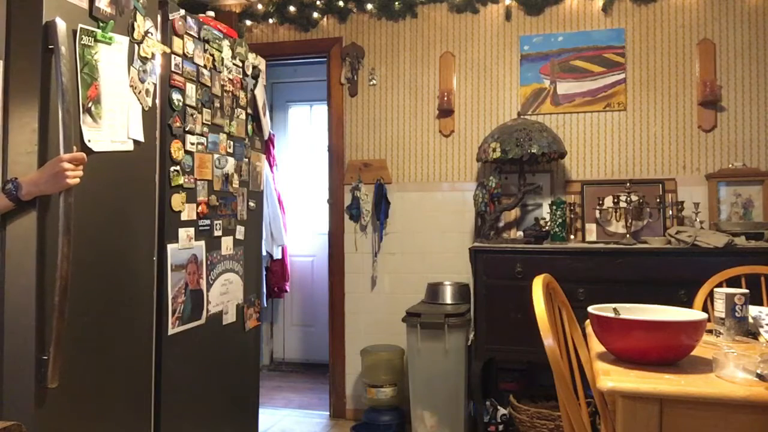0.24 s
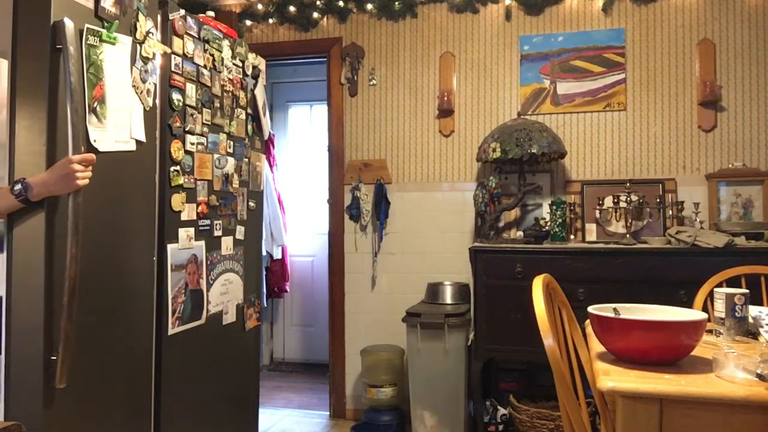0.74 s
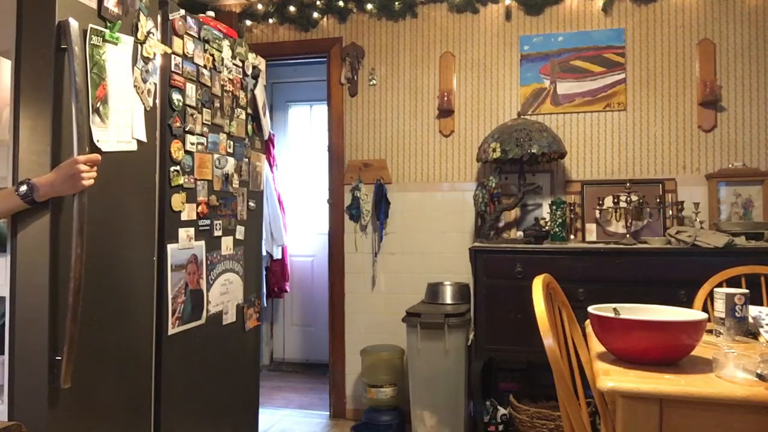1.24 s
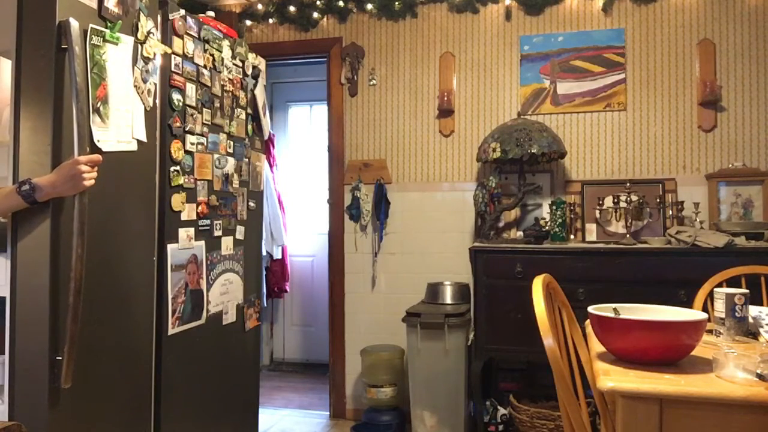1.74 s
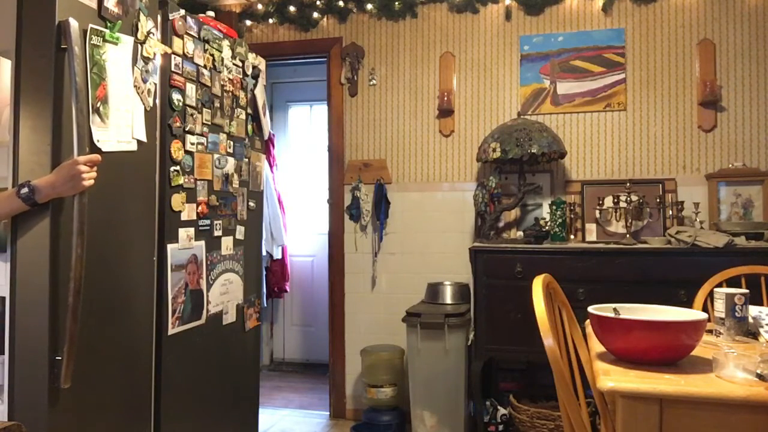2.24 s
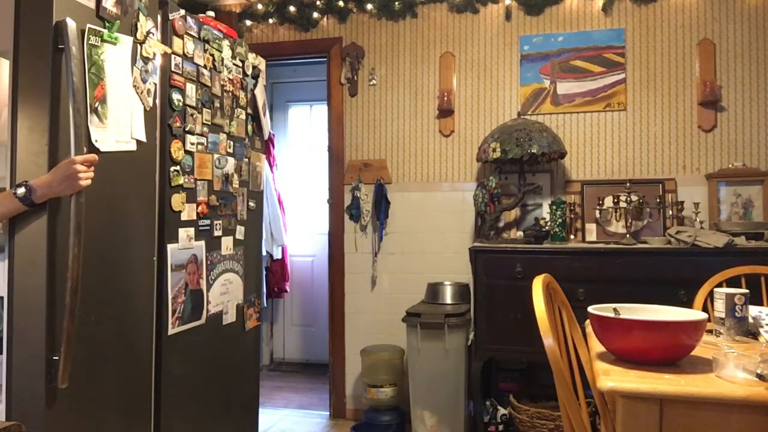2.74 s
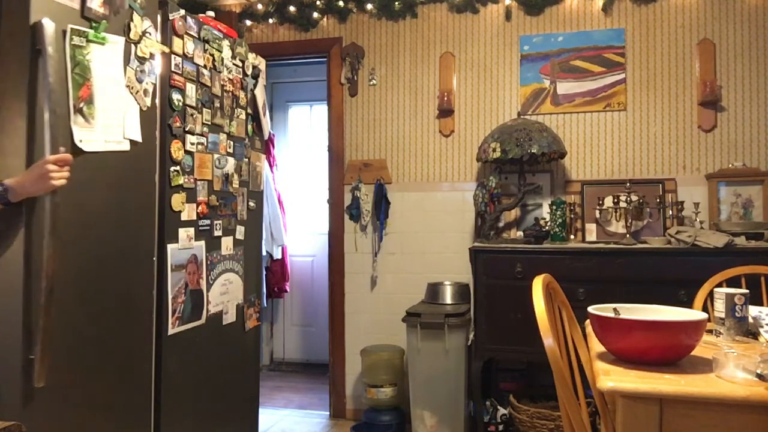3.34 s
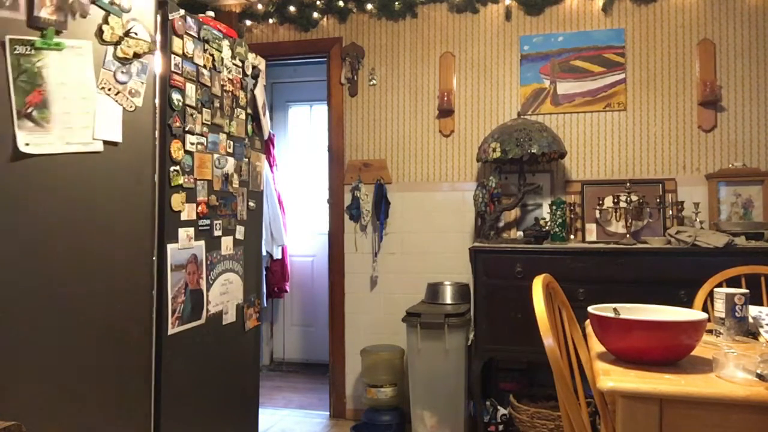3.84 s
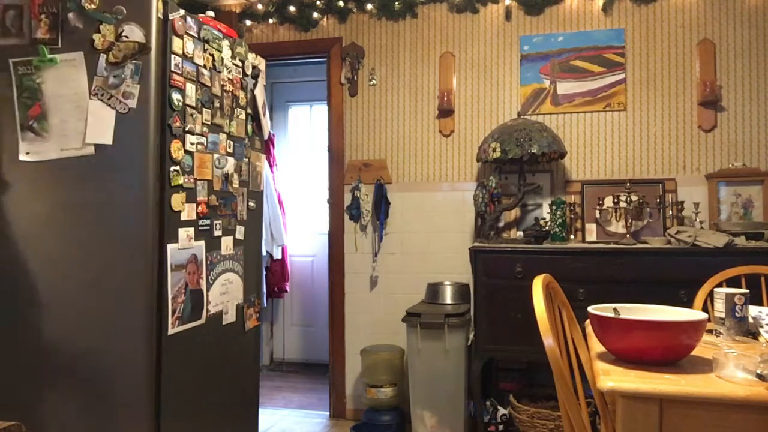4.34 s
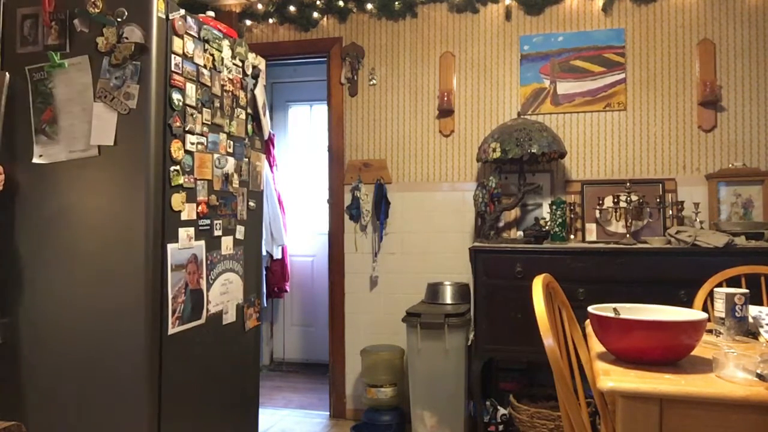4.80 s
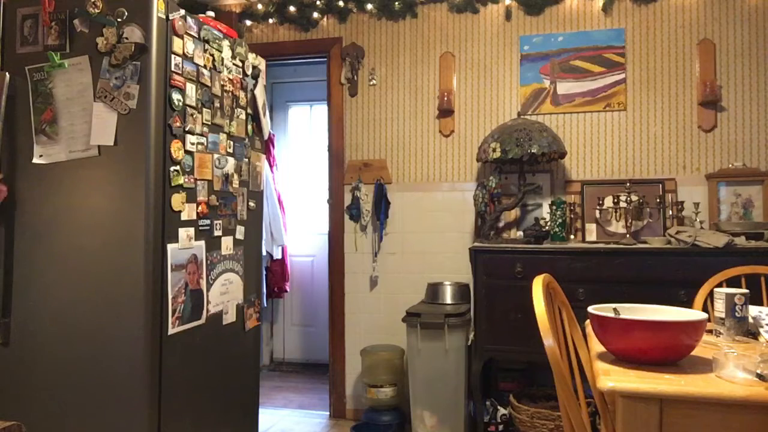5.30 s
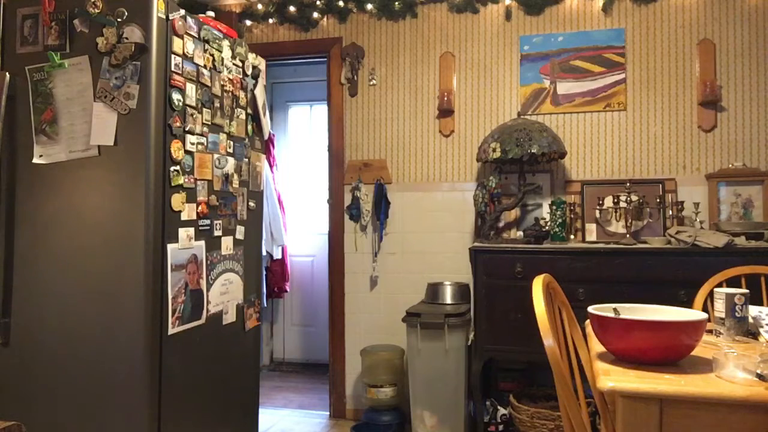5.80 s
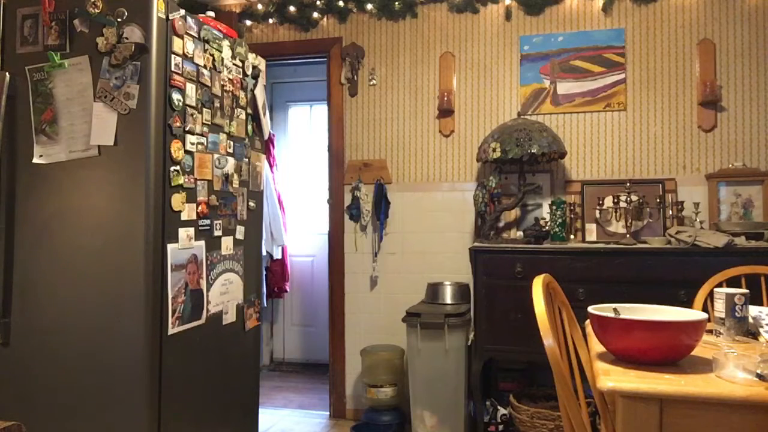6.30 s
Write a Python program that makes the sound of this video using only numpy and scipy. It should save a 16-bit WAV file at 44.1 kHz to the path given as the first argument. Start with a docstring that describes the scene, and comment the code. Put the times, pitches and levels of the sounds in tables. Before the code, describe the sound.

Near-miked refrigerator door over steady low hum: about two seconds of uneven cloth and skin rustling, muffled thumps, then a sharp seal release and rattling panel knocks. A quieter gap holds tiny taps and thin squeaks before the heavy shut. Afterward mostly hum and soft air remain, with one faint high squeak and a light late knock. Short indoor reverberation; the recording device ticks faintly and rapidly.

```python
"""A refrigerator door in a small kitchen, miked near the hand, over compressor hum and room air.
First a hand and sleeve rustle close by, as enveloped strokes of cloth-coloured noise, over soft low thumps.
Then the seal peels and shelves shift: noise blows and knocks that ring the modes of the door panel.
After a few thin squeaks the door slams at 4.6 s and bounces; one more squeak and light knocks end the take.
Throughout, a small part inside the camera ticks about thirty times a second, as a click of dying modes."""
import sys
import numpy as np
from scipy import signal
from scipy.fft import rfft, irfft, next_fast_len
from scipy.io import wavfile
from scipy.ndimage import uniform_filter1d

SR = 44100
rng = np.random.default_rng(int(sys.argv[2]) if len(sys.argv) > 2 else 0)


def dump_mix(stems):
    """Bounce the given channels to the path in sys.argv[1] as a 16-bit WAV at rate SR."""
    frames = np.atleast_2d(stems).T  # one column per channel
    limited = np.clip(frames, -1, 1)  # hard clip at full scale
    pcm = np.round(limited * 32767).astype(np.int16)
    wavfile.write(sys.argv[1], SR, pcm)


def nominal_scale(level):
    """Amplitude ratio for a level in decibels (scalar or array-like)."""
    x = np.asarray(level, float) / 20
    return 10 ** x


N = 289296  # samples, about 6.56 s


def evened(x):
    """Scales to rms 1."""
    return x / np.sqrt(np.mean(x ** 2) + 1e-20)


def read(points, hz):
    """Reads a table on a log-frequency axis."""
    point_hz, value = np.transpose(points)
    return np.interp(np.log(hz + 1), np.log(point_hz + 1), value)


def add(mix, start_s, sound):
    """Mixes a sound in at start_s, cut off at the end of the mix."""
    part = mix[max(round(start_s * SR), 0):][:len(sound)]
    part += sound[:len(part)]


def wander(count):
    """Smooth chance of rms 1 that changes over about count samples."""
    return evened(uniform_filter1d(uniform_filter1d(rng.standard_normal(N), count), count))


def ring(pitch_hz, level_db, t60_s):
    """One mode: a sine that dies by 60 dB in t60_s."""
    t = np.arange(round(t60_s * SR)) / SR
    return nominal_scale(level_db - 60 * t / t60_s) * np.sin(2 * np.pi * pitch_hz * t)


def bands(colour, grain_db, edges_hz):
    """Grainy noise of a given colour, split at the edges in parts of rms 1."""
    hz = np.fft.rfftfreq(N, 1 / SR)
    grains = rng.standard_normal(N) * nominal_scale(grain_db * wander(count=60))
    spectrum = rfft(grains) * nominal_scale(read(colour, hz))
    below = [0] + [1 / (1 + (hz / edge) ** 6) for edge in edges_hz] + [1]  # share of power under each edge
    return [evened(irfft(spectrum * np.sqrt(abs(b - a)), N)) for a, b in zip(below, below[1:])]


# Colour of the door's contact noise, relative: [pitch_hz, level_db]
DOOR_COLOUR = [(88, -3), (150, 6), (463, -13.5), (596, -15), (896, -18.5), (1130, -19), (1510, -23),
               (2510, -29.5), (3840, -32.5), (5350, -39), (6750, -38.5), (8690, -42.5), (15600, -72.5)]
# Scuffs and blows on the door; low end and brightness are relative to the level:
# [start_s, level_db, rise_s, low_end_db, brightness_db]
DOOR_BLOWS = [(2.317, -64, 0.042, 3, -8), (2.368, -59.5, 0.014, 1, 1), (2.5842, -35.5, 0.0014, -5, -9),
              (2.65, -58, 0.046, -17, 1), (2.725, -46, 0.042, 0.5, 0), (2.831, -54.5, 0.056, -2, -3.5),
              (2.919, -46.5, 0.043, -1.5, -9.5), (3.001, -36, 0.017, -4, -10.5),
              (3.043, -39.5, 0.011, -6, -7), (3.511, -60, .035, -19, -14), (3.694, -72, .015, -7, -1),
              (3.718, -61.5, 0.021, -20, -28), (3.778, -62, .02, -30, -21), (3.987, -61.5, 0.028, -10, -6),
              (4.059, -58.5, 0.039, -10, -10), (4.257, -61.5, 0.039, -10, -11),
              (4.419, -56.5, 0.0084, -20, -20), (4.434, -58, 0.019, -15, -2.5),
              (4.611, -35.5, 0.0062, -11, -5.5), (4.656, -65, 0.03, 3, -20),
              (4.702, -47, 0.0024, -11, -13.5), (6.362, -60, 0.0057, -27, -20),
              (6.531, -50, 0.0096, -20, -13)]
BLOW_HOLD_S, BLOW_T60_S = 0.0097, 0.23
SHARP_RISE_S, DULLING_DB = 0.0011, 5.5  # the top sheen drops by this for each doubling of the rise time


def blows():
    """Each scuff or blow rises, holds and dies; the treble dies sooner, and slow contacts are duller."""
    parts = bands(DOOR_COLOUR, grain_db=0.5, edges_hz=(420, 1700, 5200))
    out = np.zeros(N)
    for start_s, level_db, rise_s, low_db, bright_db in DOOR_BLOWS:
        t = np.arange(round((rise_s + BLOW_HOLD_S + 1.5 * BLOW_T60_S) * SR)) / SR
        swell = np.minimum(t / rise_s, 1) ** 0.81
        fall_db = -60 * np.maximum(t - rise_s - BLOW_HOLD_S, 0) / BLOW_T60_S
        sheen_db = bright_db - DULLING_DB * np.log2(rise_s / SHARP_RISE_S)
        # from the lowest band to the highest
        levels = (low_db + 0.79 * fall_db, fall_db, bright_db + 1.73 * fall_db, sheen_db + 1.35 * fall_db)
        for part, band_db in zip(parts, levels):
            grain = part[round(start_s * SR):][:len(t)]
            envelope = swell * nominal_scale(level_db + band_db)
            add(out, start_s, grain * envelope[:len(grain)])
    return out


# Modes of the door panel, levels relative: [pitch_hz, level_db, t60_s]
PANEL_MODES = [(145, 0, .16), (174, 1, .18), (245, 0, .15), (287, -4, .13), (385, 0, .11), (525, -3, .1),
               (657, -1, .12), (800, 0, .1), (897, 0, .11), (1040, -5, .1), (1220, -3, .09),
               (1440, -4, .07), (1770, -8, .08), (3780, -10, .06)]


def panel(x):
    """The panel modes answer whatever rubs or strikes the door."""
    body = np.zeros(SR // 2)
    for mode in PANEL_MODES:
        add(body, 0, ring(*mode))
    return signal.oaconvolve(x, body / np.linalg.norm(body))[:N]


# Hard knocks, and where each rings the panel most: [start_s, level_db, centre_hz]
HARD_KNOCKS = [(0.022, -39, 382), (0.881, -45.5, 610), (.995, -51, 600), (2.751, -37, 250),
               (2.765, -51, 1250), (2.781, -34.5, 328), (2.795, -37.5, 377), (2.94, -63, 252),
               (3.01, -38, 600), (3.018, -33, 413), (3.066, -53, 910), (3.024, -25, 192), (3.034, -31, 860),
               (3.058, -28, 186), (3.575, -62, 900), (3.801, -57, 850), (4.015, -58, 800), (4.11, -55, 880),
               (4.42, -56, 720), (4.448, -49, 1210), (2.584, -36, 1440), (2.591, -33, 680), (2.6, -34, 310),
               (2.612, -37, 330), (4.615, -29.5, 780), (4.618, -30, 165), (4.7025, -31, 385),
               (4.712, -43, 1150), (6.536, -44.5, 397)]


def knocks():
    """Every knock rings the same panel modes, most strongly near its own pitch."""
    out = np.zeros(N)
    for start_s, level_db, centre_hz in HARD_KNOCKS:
        for pitch_hz, mode_db, t60_s in PANEL_MODES:
            off_db = 14 * np.log2(pitch_hz / centre_hz) ** 2
            mode = ring(pitch_hz, level_db + mode_db - off_db, t60_s)
            late_s = 0.001565 * rng.random()  # the modes start slightly apart
            add(out, start_s + late_s, mode * rng.choice([-1, 1]))
    return out


# Cabinet and floor thumps, the loudest being the slam: [start_s, peak_db, pitch_hz, t60_s]
CABINET_THUMPS = [(0.009, -39, 72, 0.14), (0.286, -37, 70.5, 0.14), (0.649, -44, 71.6, 0.16),
                  (0.689, -38.5, 73, 0.083), (0.887, -36, 72.7, 0.12), (0.98, -35, 80, 0.19),
                  (1.048, -40, 73.6, 0.12), (1.339, -35, 72, 0.096), (1.428, -36, 80.7, 0.1),
                  (1.449, -39, 73.4, 0.081), (2.36, -37.5, 82, 0.32), (2.748, -29.5, 79.3, 0.1962),
                  (2.951, -30.5, 83.6, 0.13), (3.02, -26.5, 80.4, 0.27), (3.05, -32, 75.7, 0.31),
                  (4.666, -31, 75, 0.18), (4.6125, -17, 63, .13)]


def thumps():
    """Low modes of cabinet and floor, pushed softly so that they swell over some 9 ms."""
    out = np.zeros(N)
    for start_s, peak_db, pitch_hz, t60_s in CABINET_THUMPS:
        low = ring(pitch_hz, 0, t60_s)
        low = low * (1 - np.exp(-np.arange(len(low)) / (.009 * SR)))
        add(out, start_s, -nominal_scale(peak_db) * low / abs(low).max())
    return out


# Colour of cloth on skin, relative: [pitch_hz, level_db]
CLOTH_COLOUR = [(76, -40), (130, 0.5), (169, 14.5), (307, -1.5), (424, -9.5), (550, 1.5), (671, -8.5),
                (772, -1.5), (982, -9), (1250, -6), (2230, -16), (3760, -15.5), (5280, -22), (7420, -21.5),
                (15600, -43)]
# Strokes of hand and sleeve; low end and brightness are relative to the level:
# [start_s, level_db, hold_s, low_end_db, brightness_db]
SLEEVE_STROKES = [(0, -53, .01, 8, -27), (0.019, -59.5, 0.06, 10.5, -1), (0.109, -53, 0.037, -13, -14),
                  (0.206, -60.5, 0.09, -6, -3), (0.274, -66, .03, -15, -12), (0.307, -49.5, 0.036, -8, -10),
                  (0.346, -50.5, 0.041, -11, -4.5), (0.434, -53.5, 0.016, -4, -5.5),
                  (0.538, -68.5, 0.017, -7, -7), (0.6488, -51.5, 0.018, 3.5, -2.5),
                  (0.692, -53.5, 0.052, -11, -6.5), (0.771, -55, 0.057, -3, -1),
                  (0.86, -47.5, 0.049, -10, -7), (0.968, -48.5, 0.032, -7, -12.5),
                  (1.037, -52.5, 0.046, -6, -3), (1.126, -54.5, 0.088, -11, -8),
                  (1.192, -55.5, 0.047, -24, -3.5), (1.28, -51.5, 0.054, -20, -11.5),
                  (1.346, -49.5, 0.017, 0.5, -6.5), (1.411, -51.5, 0.017, -4.5, -6),
                  (1.508, -60, 0.027, -7, -6.5), (1.584, -59.5, 0.026, -1.5, -4.5),
                  (1.653, -58.5, 0.095, 0.5, -5.5), (1.818, -55, 0.044, -12, -13.5),
                  (1.894, -67.5, 0.02, 11.5, -9)]
STROKE_RISE_S, STROKE_FADE_DB_PER_S = 0.0054, 219
STROKE_SHEEN_DB, SHEEN_FOLLOWS = -11, 0.63  # the top sheen follows the brightness


def rustle():
    """Cloth and skin rubbing: each stroke catches quickly, holds and fades; the grains catch unevenly."""
    t, power = np.arange(N) / SR, np.zeros((4, N))
    for start_s, level_db, hold_s, low_db, bright_db in SLEEVE_STROKES:
        rise = np.clip((t - start_s) / STROKE_RISE_S, 0, 1)
        fading_s = np.maximum(t - start_s - STROKE_RISE_S - hold_s, 0)
        shape = rise * nominal_scale(level_db - STROKE_FADE_DB_PER_S * fading_s)
        colour = nominal_scale([low_db, 0, bright_db, STROKE_SHEEN_DB + SHEEN_FOLLOWS * bright_db])
        power += np.outer(colour, shape) ** 2
    parts = bands(CLOTH_COLOUR, grain_db=-1.0, edges_hz=(420, 2100, 5100))
    return sum(part * np.sqrt(p) * nominal_scale(1.5 * wander(count=400)) for part, p in zip(parts, power))


# Short thin squeaks, levels before swell and flutter: [start_s, length_s, pitch_hz, level_db]
SQUEAKS = [(4.285, .1, 1880, -66), (4.075, .05, 3780, -72), (5.34, .26, 6971, -75)]


def squeaks():
    """Brief narrow tones that swell, flutter and fade, their phase shaking."""
    out, flutter = np.zeros(N), nominal_scale(4 * wander(count=250))
    shake = 1.1 * wander(count=250)  # radians
    for start_s, length_s, pitch_hz, level_db in SQUEAKS:
        t = np.arange(round(length_s * SR)) / SR
        tone = np.sin(2 * np.pi * pitch_hz * t + shake[round(start_s * SR):][:len(t)])
        add(out, start_s, np.sqrt(2) * nominal_scale(level_db) * np.sin(np.pi * t / length_s) * tone)
    return out * flutter


# How long the small kitchen rings: [pitch_hz, t60_s]
KITCHEN_DECAY = [(100, 0.14), (1000, 0.19), (4000, 0.33), (10000, 0.29)]


def kitchen(x):
    """Room tail: sparse taps of random sign, each band dying at its own speed."""
    taps = np.zeros(SR // 2)
    at = np.arange(300, SR // 2 - 20, 20)  # the first tap comes about 7 ms late
    taps[at + rng.integers(0, 20, len(at))] = rng.choice([-1., 1.], len(at))
    hz, t, z = signal.stft(taps, SR, nperseg=256)
    decay = nominal_scale(-60 * t / read(KITCHEN_DECAY, hz)[:, None])
    tail = signal.istft(z * decay, SR, nperseg=256)[1]
    return signal.oaconvolve(x, tail / np.linalg.norm(tail))[:N]


HUM_HZ = 58.98
# Compressor shaft orders and what each loses once the door has slammed: [multiple, level_db, lost_db]
SHAFT_ORDERS = [(1, -42.6, 0), (2, -72, 0), (3, -70.5, 0), (6, -77, 0), (19, -81, 1.5), (20, -81, 1),
                (21, -74.5, 2.5)]
# The hum sags around the slam: [centre_s, half_width_s, lost_db]
HUM_SAGS = [(4.52, 0.015, 8), (4.77, 0.021, 13)]


def hum():
    """Shaft orders waver a little; the upper ones are muffled by the shut door."""
    t = np.arange(N) / SR
    turn = 2 * np.pi * HUM_HZ * t + 0.023 * wander(count=12000)
    slam_s = max(CABINET_THUMPS, key=lambda row: row[1])[0]
    shut = np.clip((t - slam_s) / .5 + 1, 0, 1)  # the gap closes as the door swings to
    sag_db = sum(lost_db * np.exp(-((t - s) / width_s) ** 2) for s, width_s, lost_db in HUM_SAGS)
    out = np.zeros(N)
    for multiple, level_db, lost_db in SHAFT_ORDERS:
        waver_db = 0.086 * multiple * wander(count=7000)
        tone = np.sin(multiple * turn + 2 * np.pi * rng.random())
        out += np.sqrt(2) * nominal_scale(level_db - lost_db * shut + waver_db) * tone
    return nominal_scale(-sag_db) * out


# Colour of room tone and fan, relative: [pitch_hz, level_db]
AIR_COLOUR = [(30, -23.5), (85, 7), (105, -4.5), (140, -9.5), (253, 3), (372, -12), (432, -11.5),
              (802, -12), (1060, -18.5), (1230, -17.5), (1340, -21), (1920, -24), (5590, -32), (7070, -34),
              (10400, -36), (15600, -46)]


def air():
    """Room tone and fan noise with faint drifting patches."""
    hz = np.fft.rfftfreq(1024, 1 / SR)
    real, imaginary, patches = rng.standard_normal((N // 256 + 5, 513, 3)).T
    patches = evened(uniform_filter1d(uniform_filter1d(patches, 10, 0), 10, 1))
    z = (real + 1j * imaginary) * nominal_scale(read(AIR_COLOUR, hz)[:, None] + 1.3 * patches)
    noise = signal.istft(z, nperseg=1024, noverlap=768)[1][:N]
    return nominal_scale(-57.5) * evened(noise)


FIRST_TICK_S, TICKS_PER_S = .0014, 29.994
# Modes of the small ticking part inside the camera: [pitch_hz, level_db, t60_s]
TICK_MODES = [(1866, -64.5, 0.018), (2800, -59, 0.0032), (3500, -62.5, 0.00084), (4666, -78, 0.0026),
              (5970, -59.5, 0.0017), (7000, -58, 0.0051), (8400, -91, 0.0043)]


def ticks():
    """The same tiny click of dying modes, its timing and strength slightly loose."""
    count = int(N / SR * TICKS_PER_S)
    late, size = rng.standard_normal((count, 2)).T
    train, click = np.zeros(N), np.zeros(600)
    at_s = FIRST_TICK_S + np.arange(count) / TICKS_PER_S + .0006 * late
    train[np.clip((at_s * SR).astype(int), 0, N - 1)] = nominal_scale(.7 * size)
    for mode in TICK_MODES:
        add(click, 0, ring(*mode))
    return signal.oaconvolve(train, click)[:N]


def scene():
    """Door and rustle with their room tail, over thumps, hum, air and ticks."""
    door = blows()
    ringing = nominal_scale(-18) * panel(door)
    near = door + ringing + knocks() + rustle() + squeaks()
    tail = nominal_scale(-11) * kitchen(near)
    return (near + tail + thumps() + hum() + air() + ticks())[None]


def low_pass(x):
    """Removes everything above the highest recorded frequency."""
    return signal.sosfilt(signal.butter(12, 15710, fs=SR, output="sos"), x)


# Colour of the microphone: [pitch_hz, level_db]
MIC_COLOUR = [(2000, 0), (3200, -2), (3780, 3), (4050, 0), (4600, 2), (5200, -2), (6000, 0), (9300, 0),
              (10500, -6), (12000, 1), (15600, 3)]


def record(dry):
    """The microphone colours the treble, and a low cut at 39 Hz thins the deepest bass."""
    size = next_fast_len(N + 8192)
    colour = nominal_scale(read(MIC_COLOUR, np.fft.rfftfreq(size, 1 / SR)))
    heard = irfft(rfft(dry, size) * colour, size)[:, :N]
    heard = signal.sosfilt(signal.butter(2, 39, "high", fs=SR, output="sos"), heard)
    return low_pass(heard)


dry = scene()
out = record(dry)
dump_mix(out)
```